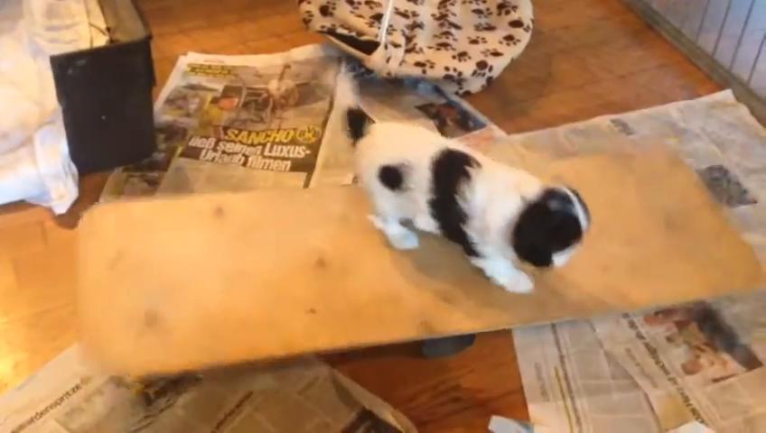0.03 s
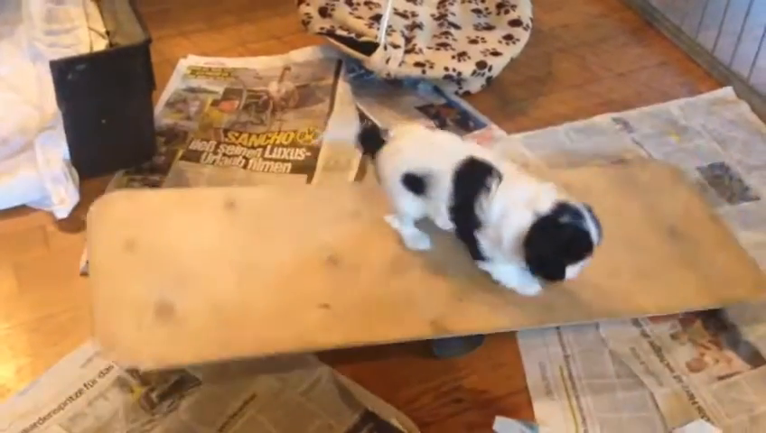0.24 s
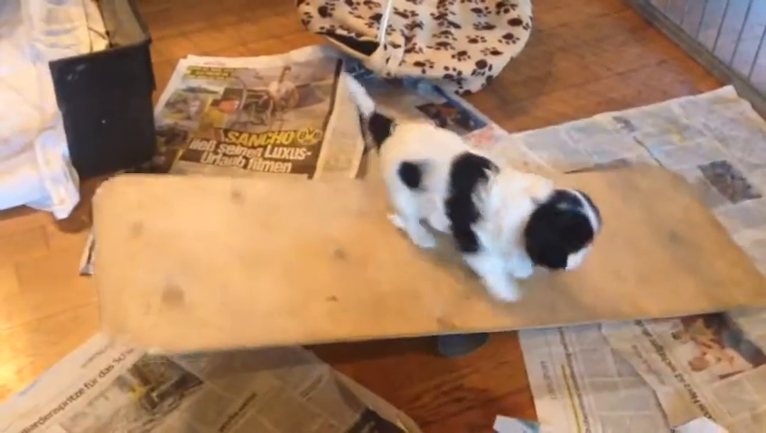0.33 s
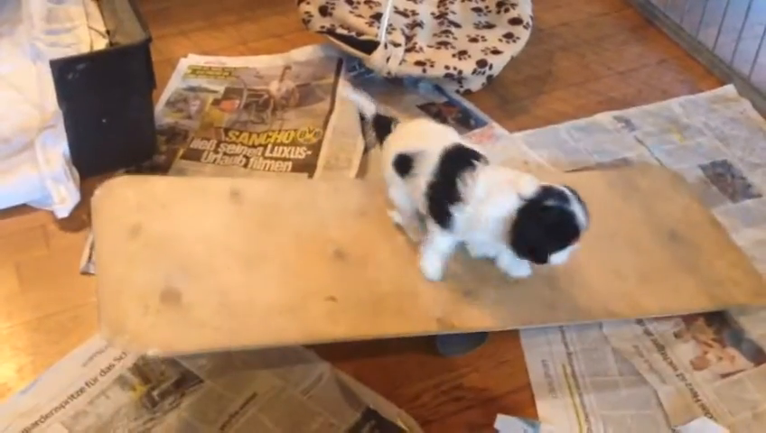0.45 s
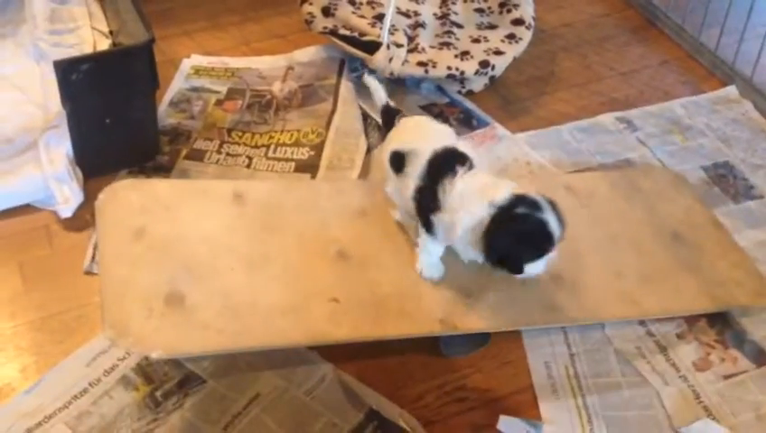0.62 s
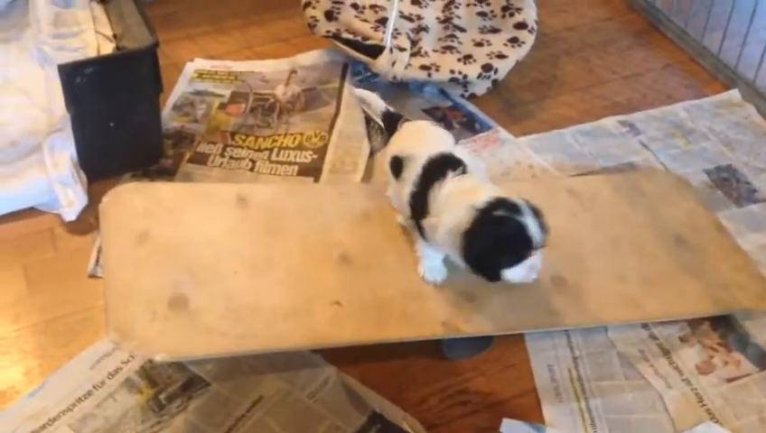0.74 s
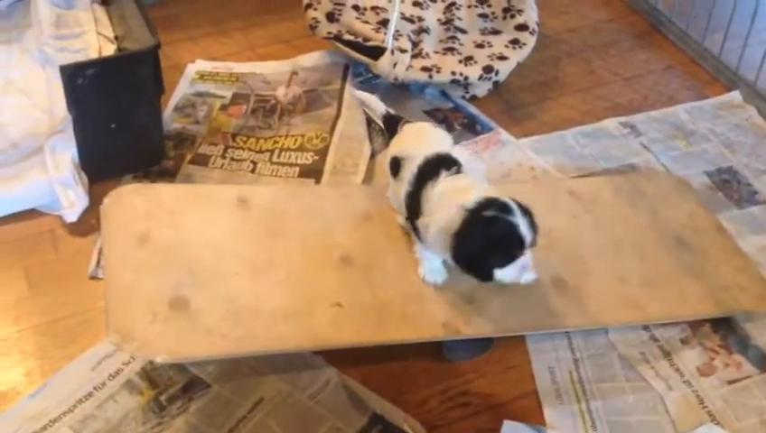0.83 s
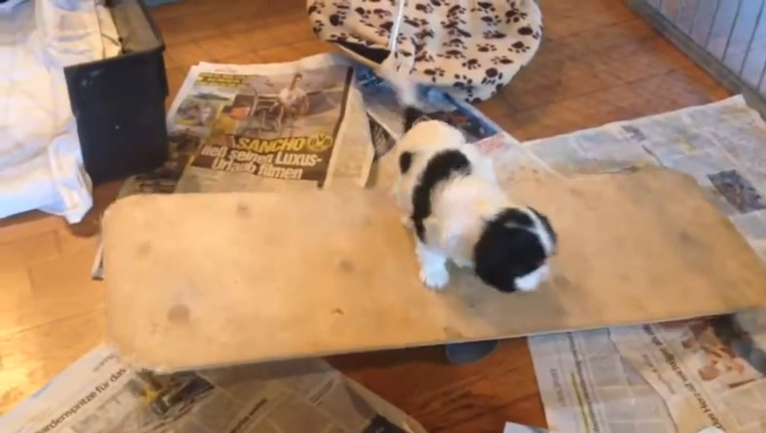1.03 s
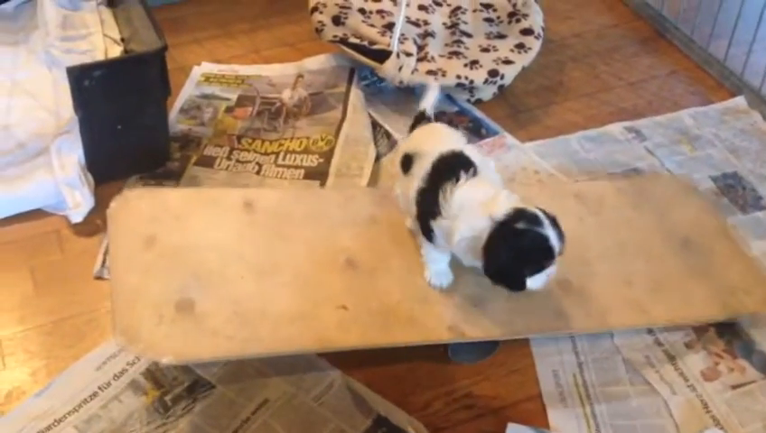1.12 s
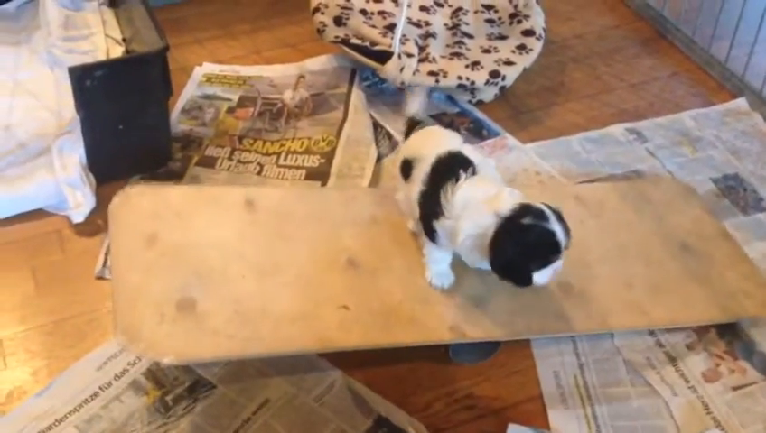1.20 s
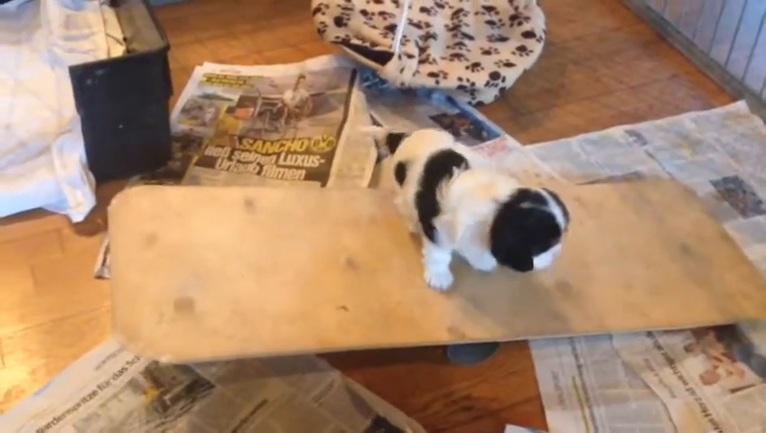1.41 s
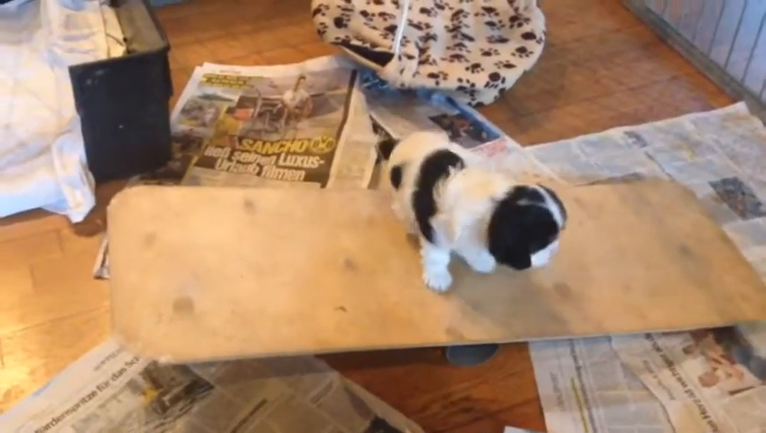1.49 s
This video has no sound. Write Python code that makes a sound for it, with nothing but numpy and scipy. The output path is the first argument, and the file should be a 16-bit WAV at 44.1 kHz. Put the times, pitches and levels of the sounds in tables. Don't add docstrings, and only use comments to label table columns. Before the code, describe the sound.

Wooden see-saw board clacks down twice sharply, then once dully, with faint paw scuffs and paper rustle.

```python
import sys
import numpy as np
from scipy import signal
from scipy.fft import rfft, irfft
from scipy.io import wavfile

SR = 44100
rng = np.random.default_rng(int(sys.argv[2]) if len(sys.argv) > 2 else 0)


def how_loud(loudness_db):
    steps = np.asarray(loudness_db, float) / 20
    return 10 ** steps


def unload_wav(signal):
    wavfile.write(
        sys.argv[1],
        SR,
        np.round(np.clip(np.atleast_2d(signal).T, -1, 1) * 32767).astype(np.int16),
    )


N = 68355


def unit(x):
    return x / np.sqrt(np.mean(x ** 2))


def at(points, hz, column=1):
    p = np.array(points)
    return np.interp(np.log(hz), np.log(p[:, 0]), p[:, column])


def colour(x, points):
    hz = np.maximum(np.arange(len(x) // 2 + 1) * SR / len(x), 1)
    bass_fall = np.minimum(hz / points[0][0], 1) ** 2
    return irfft(rfft(x) * how_loud(at(points, hz)) * bass_fall, len(x))


def fade(t, t60_s):
    return (t >= 0) * np.exp(-np.log(1000) * np.maximum(t, 0) / t60_s)


def swell(t, rise_s, t60_s):
    return fade(t, t60_s) * (1 - np.exp(-np.maximum(t, 0) / rise_s))


# frequency_hz, level_db (per Hz)
AIR_SPECTRUM = [(35, -58), (60, 17), (250, 2), (438, 2.5), (736, 2.5), (894, -4.5), (4060, -3.5),
                (7930, -17), (10500, -22), (13600, -36), (22000, -120)]


def air():
    level_db = -61
    return how_loud(level_db) * unit(colour(rng.standard_normal(N), AIR_SPECTRUM))


# frequency_hz, level_db (per Hz)
PAPER_SPECTRUM = [(800, -5), (1500, -6.5), (2500, 1), (4500, -5), (7000, -8.5), (9500, -13), (10500, -22)]
# time_s, level_db
RUSTLE_LEVELS = [(0, -55), (.06, -62), (.13, -67.5), (.18, -64), (.22, -62.5), (.5, -49), (.75, -62.5),
                 (.88, -63.5), (.98, -59), (1.06, -56.5), (1.14, -59), (1.23, -63.5), (1.4, -60),
                 (1.49, -62.5), (1.515, -71), (1.55, -54)]


def rustle():
    crinkles_per_s, crinkle_t60_s, crinkle_share, scatter_db = 980, 0.039, 0.38, 2.5
    t = np.arange(N) / SR
    chance, size = rng.random(N), rng.exponential(size=N)
    pops = (chance < crinkles_per_s / SR) * how_loud(scatter_db * size)
    grain = signal.fftconvolve(pops, fade(t[:SR // 20], crinkle_t60_s))[:N]
    grain = 1 - crinkle_share + crinkle_share * unit(grain)
    hiss = colour(rng.standard_normal(N), PAPER_SPECTRUM)
    level_db = np.interp(t, *np.array(RUSTLE_LEVELS).T)
    return unit(hiss * grain) * how_loud(level_db)


# frequency_hz, t60_s, level_db
ROOM_BANDS = [(102, 0.44, -10.5), (199, 0.64, -3.5), (423, 0.62, -3.5), (860, 0.75, -7), (1557, 0.66, -5),
              (3000, 0.65, -12.5), (6000, 0.63, -6.5), (9900, 0.21, -4.5)]


def room():
    level_db, first_wall_s, build_s = -27, .003, .012
    t = np.arange(SR) / SR
    echoes = 0
    for hz in 80 * 2 ** (np.arange(15) / 2):
        edges_hz = [hz / 2 ** .25, hz * 2 ** .25]
        sos = signal.butter(2, edges_hz, "bandpass", fs=SR, output="sos")
        noise = signal.sosfilt(sos, rng.standard_normal(SR))
        echoes = echoes + how_loud(at(ROOM_BANDS, hz, column=2)) * noise * fade(t, at(ROOM_BANDS, hz))
    return how_loud(level_db) * echoes * np.clip((t - first_wall_s) / build_s, 0, 1)


def heard(direct, spread, room_db):
    return direct + how_loud(room_db) * signal.fftconvolve(spread, room())[:N]


def band(x, hz, width_hz):
    b, a = signal.iirpeak(hz, max(2 * hz / width_hz / 3, .4), fs=SR)
    return signal.lfilter(b, a, signal.lfilter(b, a, x))


# start_s, level_db, centre_hz, width_hz, t60_s
PAW_SCUFFS = [(.012, -53.5, 2800, 2500, 0.07), (.1465, -66, 6000, 5200, 0.0082),
              (.166, -49, 4500, 1400, 0.065), (.15, -61, 292, 297, 0.34), (.178, -53.5, 2150, 1500, .12),
              (.565, -58.5, 7000, 5100, 0.018), (.675, -39.5, 4800, 4000, 0.0071),
              (.7347, -45.5, 7040, 4860, 0.025), (.741, -46, 4000, 6000, 0.042),
              (.7991, -47, 5800, 2090, 0.02), (.9078, -47, 3500, 4000, 0.031),
              (0.915, -47.5, 1630, 900, 0.075), (1.0106, -36.5, 6900, 6000, 0.019),
              (1.01, -45, 4550, 497, 0.025), (1.045, -42, 4000, 6000, 0.012),
              (1.052, -63, 7060, 4000, .015), (1.076, -51.5, 7000, 6000, 0.11),
              (1.079, -59, 5000, 503, 0.055), (1.2521, -52, 7000, 4970, 0.017),
              (1.266, -52.5, 6000, 6000, 0.15), (1.385, -65, 7100, 5000, .02),
              (1.4137, -46.5, 4000, 3000, 0.049), (1.5224, -45.5, 6000, 6900, 0.11),
              (1.526, -50, 4700, 600, 0.043), (1.53, -47, 2300, 1220, 0.13)]


def scuffs():
    rise_s, top_hz, room_db = 0.0005, 8500, -3
    t = np.arange(N) / SR
    noise = rng.standard_normal(N)
    x = 0
    for start_s, level_db, hz, width_hz, t60_s in PAW_SCUFFS:
        x = x + how_loud(level_db) * unit(band(noise, hz, width_hz)) * swell(t - start_s, rise_s, t60_s)
    x = signal.lfilter(*signal.butter(2, top_hz, fs=SR), x)
    return heard(x, x, room_db)


def ring_board(push, modes, t60_share):
    t = np.arange(SR // 4) / SR
    response = sum(how_loud(db) * np.sin(2 * np.pi * hz * t) * fade(t, t60_share * t60_s) for hz, db, t60_s in modes)
    return -.3 * signal.fftconvolve(push, response)[:N]


def knock(hits, modes, crack, crack_db, room_db, beam_hz):
    crack_rise_s, crack_t60_s = 0.0012, 0.035
    spread_share = .4
    dipole_hz = 352
    t = np.arange(N) / SR
    push, snap = 0, 0
    for start_s, level_db, length_ms in hits:
        sigma_s = length_ms / 4000
        bump = np.exp(-.5 * ((t - start_s) / sigma_s) ** 2) / (2.5 * sigma_s * SR)
        push = push + how_loud(level_db) * bump
        hardness = (.3 / length_ms) ** 2
        snap = snap + how_loud(level_db) * hardness * swell(t - start_s, crack_rise_s, crack_t60_s)
    snap = how_loud(crack_db) * snap * unit(colour(rng.standard_normal(N), crack))

    loudest_s = max(hits, key=lambda hit: hit[1])[0]
    click = (np.arange(N) == int(loudest_s * SR)) * 1.
    dulled = signal.lfilter(*signal.butter(1, beam_hz, fs=SR), ring_board(push, modes, spread_share))
    spread = dulled + np.std(snap) * unit(colour(click, crack))

    wood = signal.lfilter(*signal.butter(2, dipole_hz, "highpass", fs=SR), ring_board(push, modes, 1))
    return heard(wood + snap, spread, room_db)


KNOCK_ROOM = [1, 2.5, 2.5]
KNOCK_BEAM = [2500, 2170, 1100]
# start_s, level_db, length_ms
FIRST_CONTACTS = [
    (.2243, -32.5, 0.083),
    (.2277, -14.5, 0.11),
    (.2288, -4.5, 0.4),
    (.2308, -7.5, 0.96),
    (.2347, -13.5, .5),
    (.2370, -12.5, 0.26),
    (.2408, -1.5, 0.37),
    (.2725, -13, 0.9),
]
# pitch_hz, level_db, t60_s
FIRST_BOARD = [(162, -22, 0.043), (259, -10, 0.16), (407, 2, 0.019), (507, -4, 0.064), (790, -3.5, 0.024),
               (1102.2, -6, 0.14), (1560, -9, 0.035), (2040, -14, 0.031), (3050, -19, 0.0046),
               (3930, 3, 0.009)]
# frequency_hz, level_db (per Hz)
FIRST_EDGE = [(500, 11), (1500, -1.5), (3000, -3), (4800, -12), (5500, -18), (8500, -24.5), (10500, -39.5)]


def first_knock():
    return knock(FIRST_CONTACTS, FIRST_BOARD, FIRST_EDGE, -14, KNOCK_ROOM[0], KNOCK_BEAM[0])


# start_s, level_db, length_ms
SECOND_CONTACTS = [
    (.4363, -2, 0.23),
    (.4430, -53, 0.13),
    (.4480, -7.5, 0.34),
    (.4515, -11, 0.73),
]
# pitch_hz, level_db, t60_s
SECOND_BOARD = [(167, 0, 0.028), (245.6, -16, 0.035), (397, -3.5, 0.072), (540, -6.5, 0.048),
                (743, -5, 0.056), (994, 0.5, 0.019), (1500, 5.5, 0.0092), (1713, -12, 0.047),
                (2300, -9, 0.03), (3000, -1.5, 0.016), (3496, 5, 0.017)]
# frequency_hz, level_db (per Hz)
SECOND_EDGE = [(500, 1), (1500, -2.5), (3000, -6), (4800, -13.5), (5500, -19.5), (8500, -29), (10500, -44)]


def second_knock():
    return knock(SECOND_CONTACTS, SECOND_BOARD, SECOND_EDGE, -17, KNOCK_ROOM[1], KNOCK_BEAM[1])


# start_s, level_db, length_ms
THIRD_CONTACTS = [
    (1.2748, -12.5, 0.42),
    (1.2830, -14.5, 0.64),
    (1.2858, -13, .6),
    (1.2915, -21, 1),
]
# pitch_hz, level_db, t60_s
THIRD_BOARD = [(183, -1, 0.04), (264, -56, 0.087), (366, -0.5, 0.019), (566, 2, 0.035), (791, -1.5, 0.044),
               (1047, -1.5, 0.027), (1256, 2, 0.015), (1623, -7, 0.039), (2500, -1.5, 0.0079),
               (3320, -19, .012)]
# frequency_hz, level_db (per Hz)
THIRD_EDGE = [(500, 1.5), (1500, -7.5), (3000, -12), (4500, -21), (6000, -53), (10500, -81)]


def third_knock():
    return knock(THIRD_CONTACTS, THIRD_BOARD, THIRD_EDGE, -11, KNOCK_ROOM[2], KNOCK_BEAM[2])


def scene():
    background = air() + rustle() + scuffs()
    board = first_knock() + second_knock() + third_knock()
    return (background + board)[None]


def top_cut(x):
    return signal.sosfilt(signal.butter(12, 10910, fs=SR, output="sos"), x)


def record(dry):
    bass_cut_hz, drive, bend, top_hz = 175, 1.3, 1, 10350
    x = signal.sosfilt(signal.butter(4, bass_cut_hz, "highpass", fs=SR, output="sos"), dry)
    x = np.tanh(drive * (x + bend * x ** 4)) / drive
    x = signal.sosfilt(signal.ellip(7, .3, 70, top_hz, fs=SR, output="sos"), x)
    return top_cut(x)


dry = scene()
out = record(dry)
unload_wav(out)
```